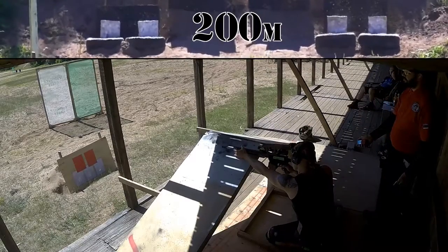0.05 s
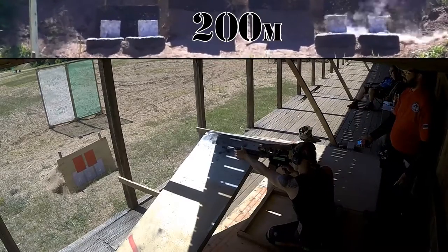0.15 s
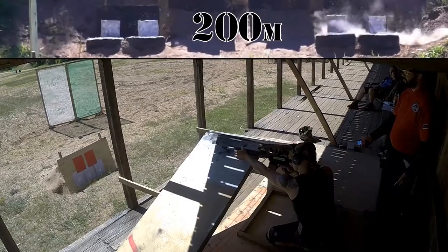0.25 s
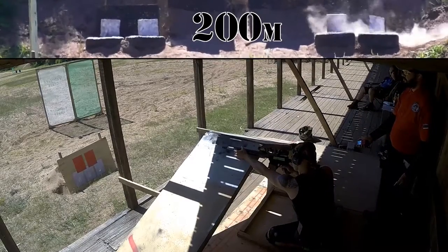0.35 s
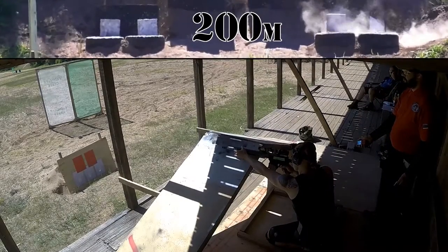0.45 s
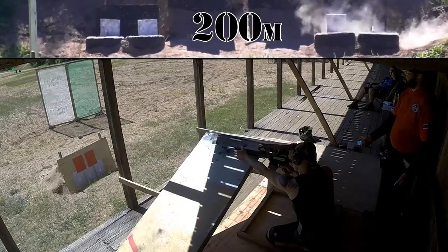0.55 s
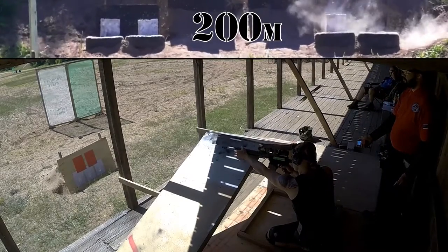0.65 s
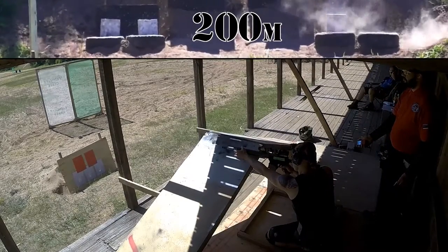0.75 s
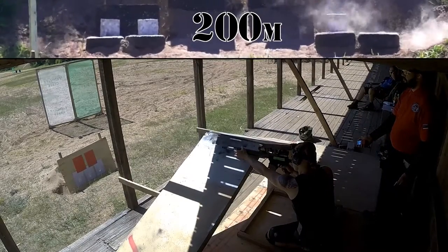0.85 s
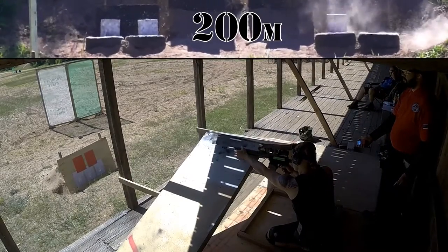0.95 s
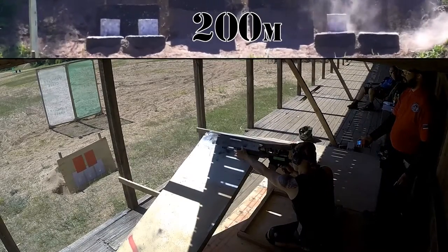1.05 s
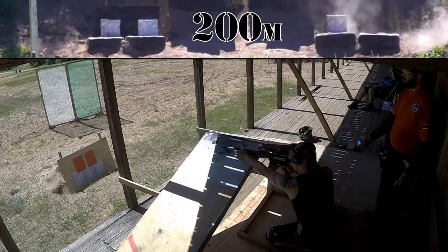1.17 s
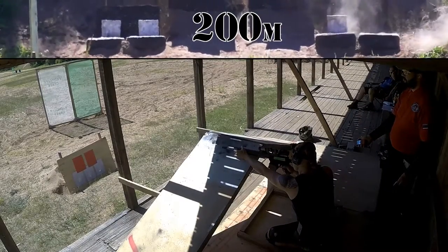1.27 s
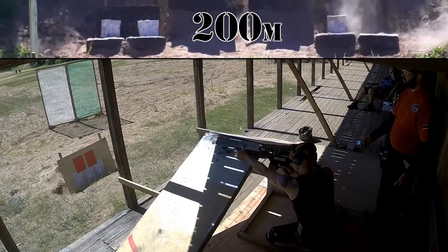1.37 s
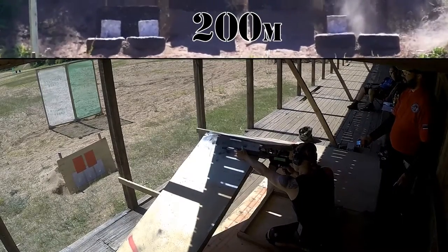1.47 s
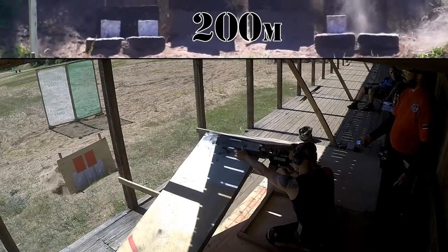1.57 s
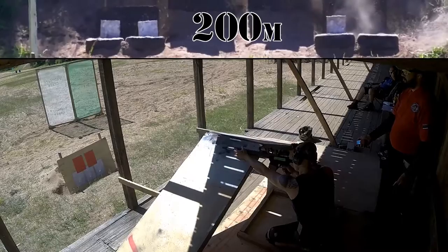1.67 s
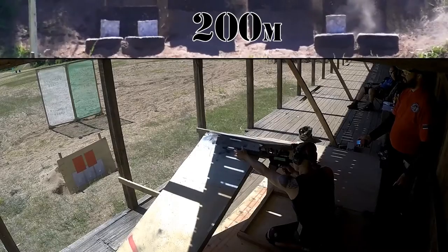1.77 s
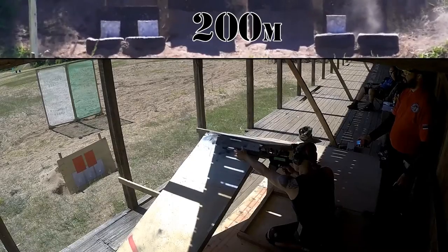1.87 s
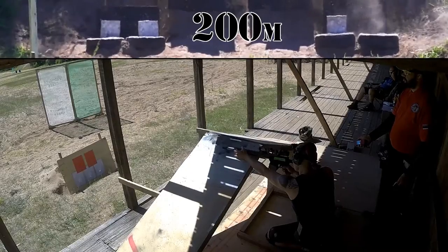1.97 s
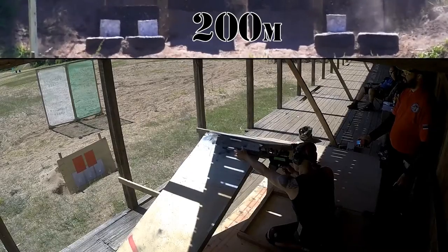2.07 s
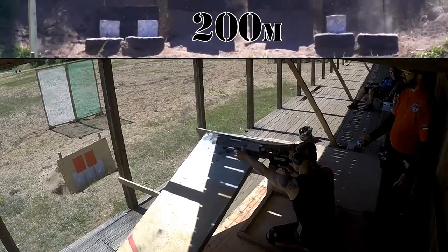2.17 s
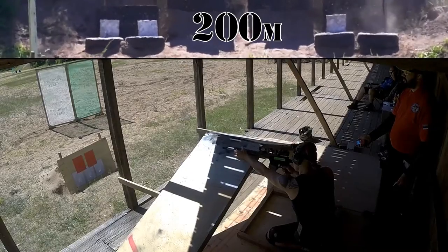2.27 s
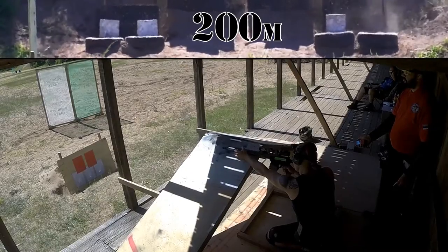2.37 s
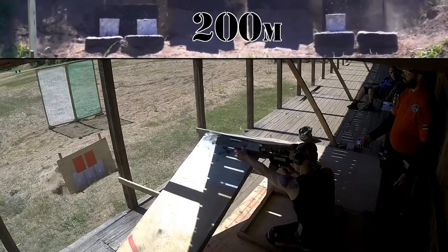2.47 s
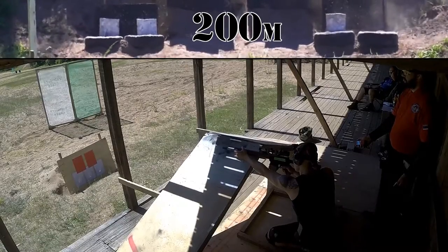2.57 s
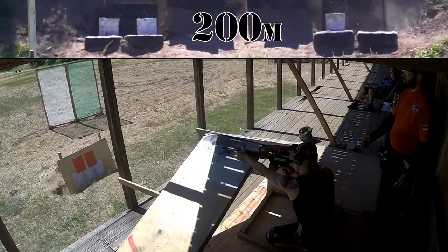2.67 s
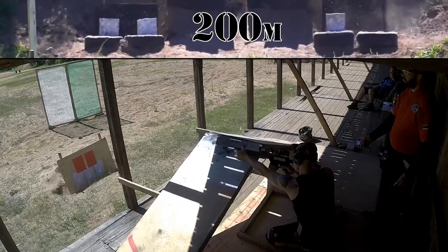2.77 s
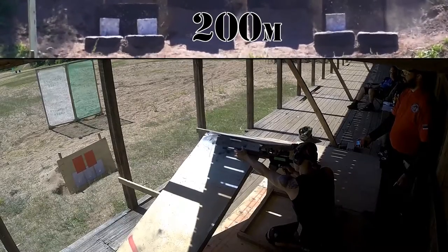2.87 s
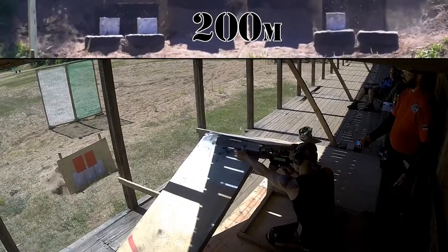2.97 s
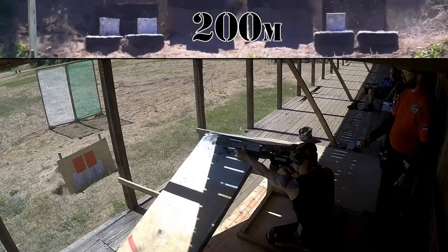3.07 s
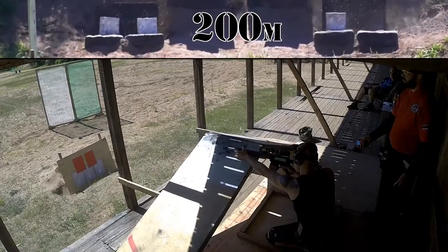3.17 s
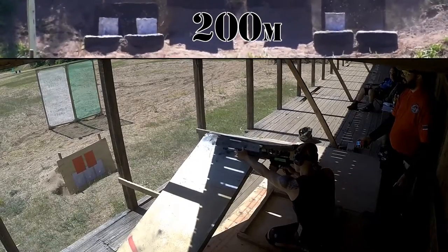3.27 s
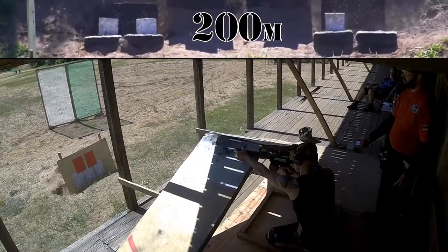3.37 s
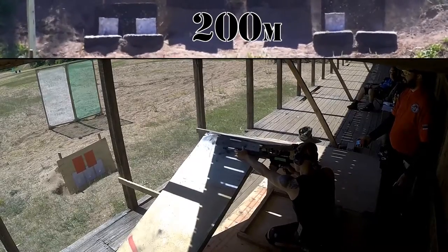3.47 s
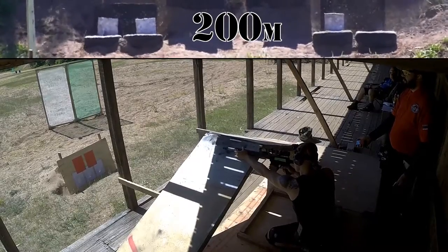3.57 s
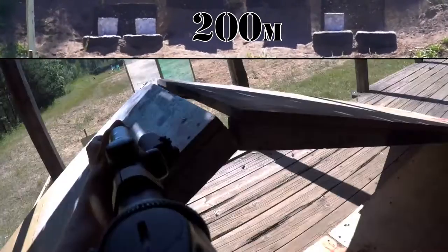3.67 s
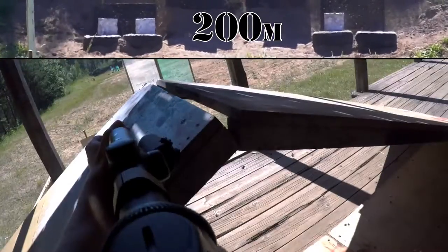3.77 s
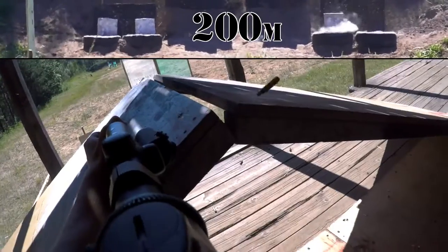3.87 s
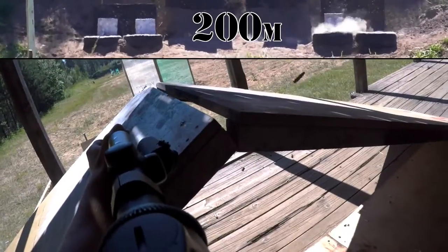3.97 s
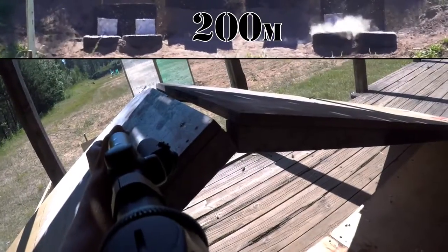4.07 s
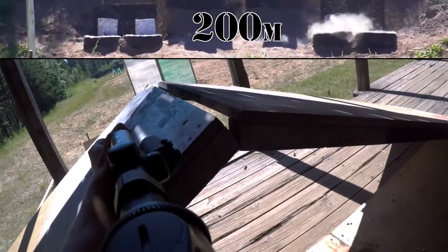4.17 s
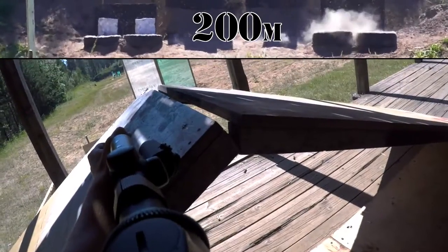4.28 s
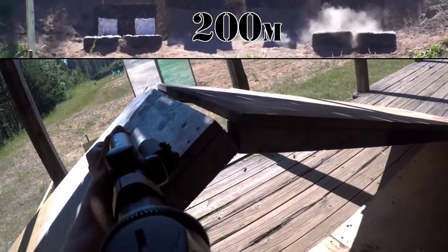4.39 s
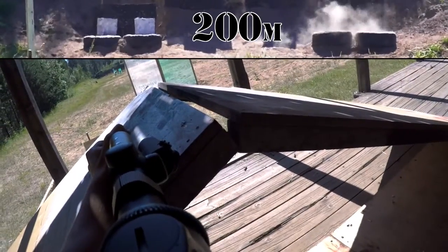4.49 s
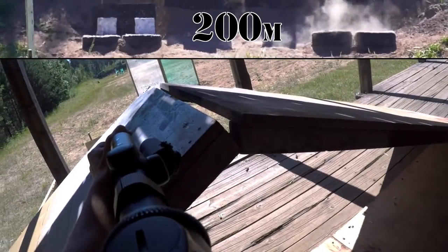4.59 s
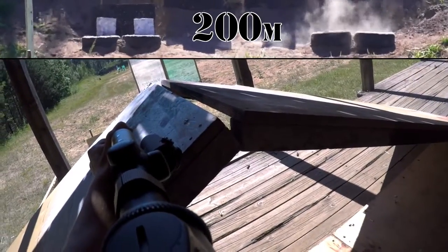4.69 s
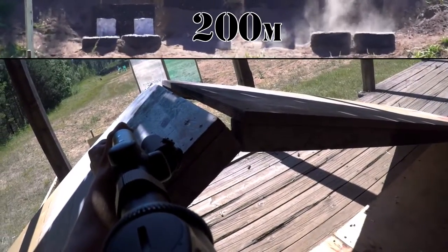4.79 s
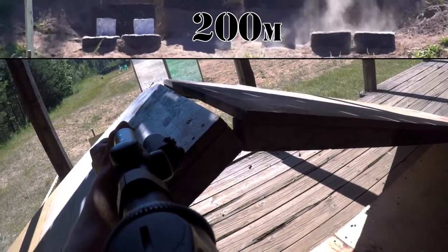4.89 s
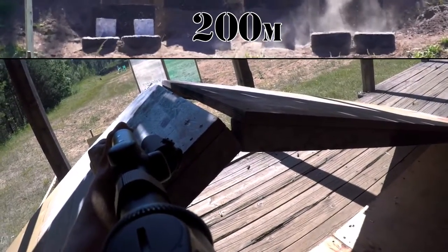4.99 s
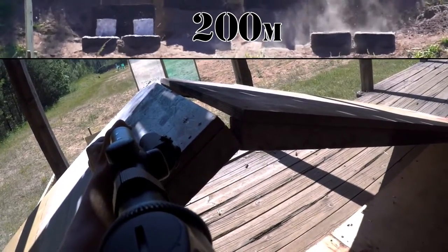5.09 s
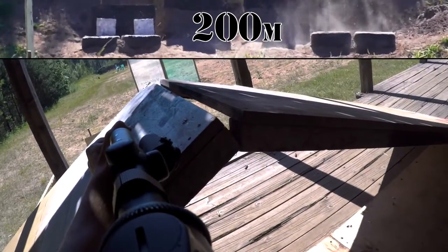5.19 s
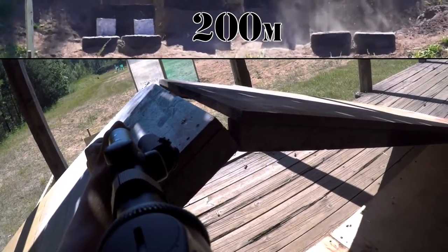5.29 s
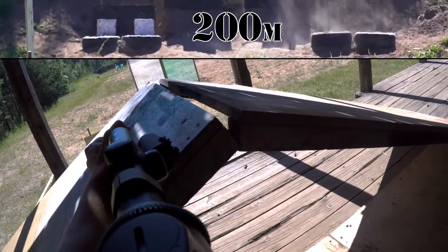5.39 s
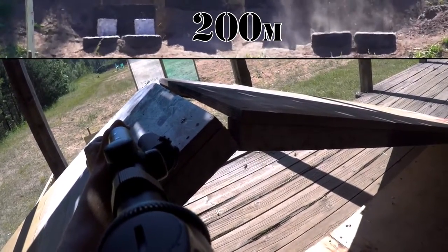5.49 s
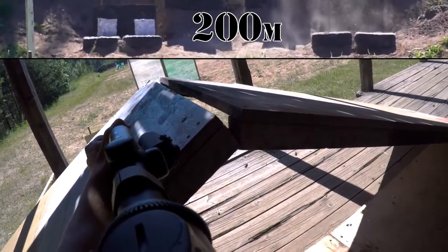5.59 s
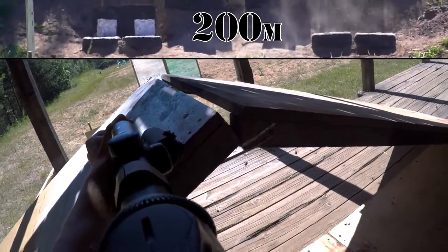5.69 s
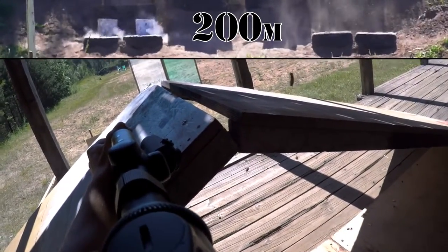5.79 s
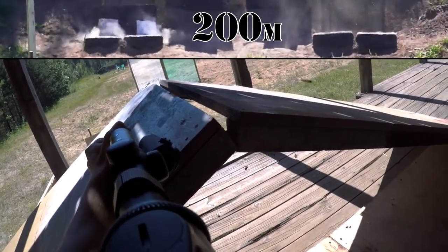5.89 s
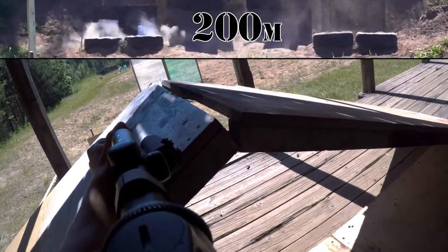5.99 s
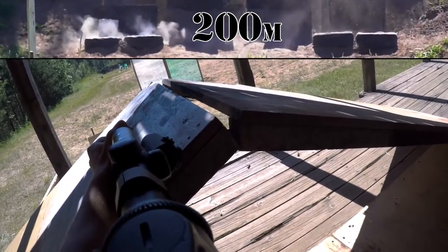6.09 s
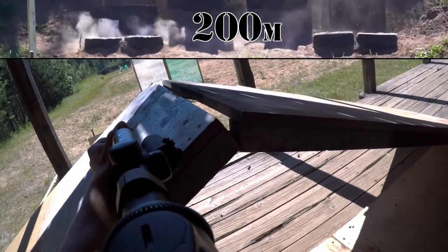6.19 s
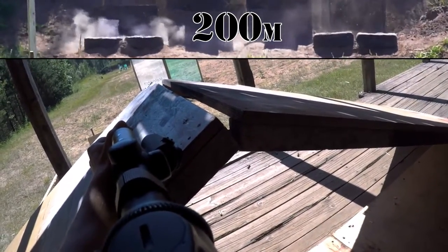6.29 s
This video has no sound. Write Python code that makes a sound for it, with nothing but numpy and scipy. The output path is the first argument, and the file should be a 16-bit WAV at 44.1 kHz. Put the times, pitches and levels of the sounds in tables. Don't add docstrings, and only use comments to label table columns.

```python
import sys
import numpy as np
from scipy import signal
from scipy.fft import rfft, irfft, next_fast_len
from scipy.io import wavfile
from scipy.ndimage import uniform_filter1d, minimum_filter1d

SR = 44100
rng = np.random.default_rng(int(sys.argv[2]) if len(sys.argv) > 2 else 0)


def digitize_waveform(pressure):
    field = np.atleast_2d(pressure).T
    bounded = np.clip(field, -1, 1)
    quanta = np.round(bounded * 32767).astype(np.int16)
    wavfile.write(sys.argv[1], SR, quanta)


def convert_level_to_amplitude(level_db):
    exponent = np.asarray(level_db, float) / 20
    return 10 ** exponent


N = 279594


def on_log(table, hz):
    f, value = np.transpose(table)
    return np.interp(np.log(hz + 1), np.log(f), value)


def add(out, x, start_s):
    i = int(start_s * SR)
    out[i:i + len(x)] += x[:len(out) - i]


def band_noise(low_hz, high_hz, order, size):
    b, a = signal.butter(order, [low_hz, high_hz], "band", fs=SR)
    return signal.lfilter(b, a, rng.standard_normal(size))


def bands(size, colour, centres):
    hz = np.fft.rfftfreq(size, 1 / SR)
    spectrum = rfft(rng.standard_normal(size)) * convert_level_to_amplitude(on_log(colour, hz))
    share = np.array([on_log(np.c_[centres, row], hz) for row in np.eye(len(centres))])
    parts = irfft(spectrum * share, size)
    return parts / np.std(parts.sum(0))


def walk(rate):
    k = int(SR / rate)
    held = np.repeat(rng.standard_normal(N // k + 1), k)
    return 1.3 * uniform_filter1d(uniform_filter1d(held, k), k)[:N]


def volley(times, shots, echoes, colour, t60, boom, air_db, boom_db, crack_db, rasp_hz, front_db,
           crack_s, wash_s, rise_s, same):
    out, t = np.zeros(N), np.arange(1 << 15) / SR
    hz, t60_s = np.transpose(t60)
    fade = convert_level_to_amplitude(-60 * t / t60_s[:, None]) * (1 - np.exp(-t / rise_s))
    shelter = bands(len(t), colour, hz)
    body = sum(swing * convert_level_to_amplitude(db - 60 * t / s) * np.sin(2 * np.pi * f * t) for f, db, s, swing in boom)
    front = convert_level_to_amplitude(front_db) * (1 - t / .0002) * np.exp(-t / .0004)
    bursts = sum((t >= lag) * convert_level_to_amplitude(db - 60 * abs(t - lag) / crack_s) for lag, db in echoes)
    for at, (db, rasp_db, wash_db, build_s) in zip(times, shots):
        air = same * shelter + np.sqrt(1 - same ** 2) * bands(len(t), colour, hz)
        rasp = convert_level_to_amplitude(crack_db + rasp_db) * bursts * band_noise(*rasp_hz, 1, len(t))
        wash = bands(len(t), colour, hz)[-2:].sum(0) * convert_level_to_amplitude(wash_db - 60 * t / wash_s)
        room = convert_level_to_amplitude(air_db) * (air * fade).sum(0) + convert_level_to_amplitude(boom_db) * body
        room = room * (1 - np.exp(-t / build_s))
        add(out, convert_level_to_amplitude(db) * (room + rasp + wash + front), at)
    return out


NEAR_S = [.0891, 1.3051, 2.3737, 3.0898, 3.7966, 5.6750]
# (strength [dB], rasp [dB], lingering wash [dB], build-up [s])
NEAR = [
    (-10, 5, -30, 0.00091),
    (-7.5, 1, -21, 0.0012),
    (-7.5, -0.5, -21, 0.0026),
    (-6, -4, -19.5, 0.0097),
    (-10, 3, -39, 0.0022),
    (-7, 2, -20.5, 0.00078),
]
# (delay [s], level [dB])
NEAR_ECHO = [(0, 0), (.0045, -10.5), (.0075, -2.5), (0.014, -4), (0.014, -8.5), (0.021, -17.5),
             (0.029, -16.5)]
# (frequency [Hz], level [dB per Hz])
NEAR_AIR = [(150, -14.5), (260, -5), (648, -5.5), (744, -8.5), (1010, -5.5), (1110, -8), (1210, -5),
            (4320, -15), (14400, -41), (16000, -65.5)]
# (frequency [Hz], t60 [s])
NEAR_T60 = [(60, 0.15), (190, 0.39), (400, 0.27), (1000, 0.23), (3000, 0.18), (7000, 0.2), (14000, 0.19)]
# (frequency [Hz], level [dB], t60 [s], first swing [+1 out, -1 in])
BOOM = [(41.3, 5.5, .14, -1), (74, 1.5, 0.11, 0.98), (112.9, 5, 0.12, -1), (152.5, -2, 0.3, -1),
        (209.1, 0.5, 0.15, 0.99), (262.7, 6, .09, -0.63), (283.3, -4, 0.18, 0.95), (376.3, -11, 0.34, 0.9),
        (477, -10, .17, -1), (591, -10, 0.32, 0.74), (796, -15.5, 0.092, -0.9), (848, -7, 0.21, 0.92),
        (1172, -15, 0.17, 1)]


def near_rifle():
    return volley(NEAR_S, NEAR, NEAR_ECHO, NEAR_AIR, NEAR_T60, BOOM, air_db=6, boom_db=2.5, crack_db=7.5,
                  rasp_hz=(1500, 7000), front_db=-6.5, crack_s=0.016, wash_s=.6, rise_s=0.0012, same=0.86)


def action():
    out, u = np.zeros(N), np.arange(400) / SR
    for at in NEAR_S:
        click = np.diff(rng.standard_normal(101)) * np.linspace(.15, 1, num=100)
        add(out, convert_level_to_amplitude(-13) * click, at - 100 / SR)
        for lag, db in [(.148, -52), (.16, -58)]:
            clack = band_noise(5000, 13000, 2, len(u))
            level = convert_level_to_amplitude(db + 3 * rng.standard_normal() - 60 * u / .02)
            add(out, level * clack, at + lag + .006 * rng.standard_normal())
    return out


FAR_S = [.0289, 1.8478, 3.7453]
# (strength [dB], rasp [dB], lingering wash [dB], build-up [s])
FAR = [
    (1, 0.012, -25, 0.00036),
    (-6.5, 0.0073, -16.5, 0.00025),
    (-3, 0.00034, -21, .0002),
]
# (delay [s], level [dB])
FAR_ECHO = [(0, -9.5), (.004, -9.5), (.009, -8.5), (0.013, -5.5)]
# (frequency [Hz], level [dB per Hz])
FAR_AIR = [(35, -43.5), (60, -8), (200, 4), (480, -4), (636, -2.5), (822, -0.5), (1580, -7.5),
           (1780, -11.5), (3670, -13), (9790, -37), (14200, -48), (16000, -82)]
# (frequency [Hz], t60 [s])
FAR_T60 = [(60, 0.37), (250, 0.34), (600, 0.19), (1500, 0.14), (4000, 0.13), (12000, 0.19)]
# (frequency [Hz], level [dB], t60 [s], first swing [+1 out, -1 in])
FAR_BOOM = [(45, -4.5, 0.075, -1), (102, -1.5, 0.13, 0.99), (191.2, -3.5, 0.3, -0.8), (285, -10, 0.38, 1),
            (383, 2, 0.085, 1), (464.3, 0, 0.12, -1.7), (586, -7.5, 0.29, -1), (803, 0.5, 0.1, 1),
            (2000, -6.5, 0.19, 0.75)]


def far_rifle():
    return volley(FAR_S, FAR, FAR_ECHO, FAR_AIR, FAR_T60, FAR_BOOM, air_db=-2.5, boom_db=-7.0, crack_db=-24,
                  rasp_hz=(900, 4500), front_db=2, crack_s=0.019, wash_s=.8, rise_s=0.0022, same=0.67)


# (time [s], tick rms [dB], tail t60 [s], tail level [dB], treble [dB])
TICKS = [
    (.538, -55, .1, -4, 0),
    (0.9095, -29.5, 0.32, -3, -2.5),
    (1.188, -45.5, 0.25, 2.5, -10),
    (4.616, -41, 0.2, -1.5, 6),
    (4.631, -35.5, 0.14, -4.5, -4),
    (4.905, -54, .09, -13.5, 5),
    (4.92, -79, 0.041, -10, 17),
    (5.008, -66, .1, -3, 4),
    (5.082, -47, 0.55, -4, -5.5),
]
# (frequency [Hz], level [dB per Hz])
TICK_AIR = [(35, -42.5), (60, -28.5), (569, -10), (893, -12), (1120, -8), (1430, -6.5), (2050, -5.5),
            (2810, -9.5), (5780, -20.5), (13000, -71)]
# (frequency [Hz], rms [dB], loudest after [s], swell width [s])
CASE_A = [(1828, -48, .1, .2), (2502, -57, .09, .08), (3024, -59, .02, .07), (3349, -60, .06, .06),
          (3504, -57, .03, .07), (4132, -64, .15, .12), (5293, -61, .18, .05), (5678, -58, .1, .055),
          (6299, -79, .18, .08), (7450, -81, .05, .1), (8231, -78, .05, .04), (9620, -96, .11, .04)]
# (frequency [Hz], rms [dB], loudest after [s], swell width [s])
CASE_B = [(1726, -57, .15, .2), (3240, -65, .15, .2), (4869, -75, .27, .1), (5207, -67, .07, .35),
          (7680, -93, .02, .1)]
# (frequency [Hz], rms [dB], loudest after [s], swell width [s])
CHIRP = [(13018, -66, .03, .045)]
# (time [s], length [s], partials)
RINGS = [
    (.93, .26, CASE_A),
    (4.65, .34, CASE_B),
    (1.905, .15, CHIRP),
    (2.26, .1, CHIRP),
]


def spent_cases():
    out, t = np.zeros(N), np.arange(N) / SR
    for at, db, t60, tail_db, treble_db in TICKS:
        u = t[:SR // 3]
        low, high = bands(len(u), TICK_AIR, [2000, 5000])
        grit = (low + convert_level_to_amplitude(treble_db) * high) * (1 - np.exp(-u / 0.00026)) ** 2
        fall = convert_level_to_amplitude(-60 * u / 0.02) + convert_level_to_amplitude(tail_db - 60 * u / t60)
        add(out, convert_level_to_amplitude(db) * grit * fall, at)
    for start, length, modes in RINGS:
        u = t[:int(length * SR)]
        edge = np.clip(np.minimum(u / .01, (length - u) / 0.027), 0, 1)
        for hz, db, top, spread in modes:
            swell = convert_level_to_amplitude(2 * walk(60)[:len(u)]) / (1 + ((u - top) / spread / 1.4) ** 2) ** 2
            add(out, np.sqrt(2) * convert_level_to_amplitude(db) * edge * swell * np.sin(2 * np.pi * hz * u), start)
    return out


# (time [s], near scatter [dB], far return [dB], return brightness [dB], microphone gain dip [dB])
ROLLS = [
    (-.3, -45.5, -39, 1, 5),
    (.089, -47.5, -35.5, 0.5, 30.5),
    (1.305, -51, -42, 6, 13),
    (1.848, -43.5, -38.5, 0.5, 6),
    (2.374, -49, -37.5, 0.5, 14),
    (3.09, -48, -37, 2.5, 11.5),
    (3.797, -48.5, -37, 0.5, 16),
    (4.76, -91, -46, 5, 0),
    (5.02, -92.5, -42.5, -0.5, -4),
    (5.675, -47, -39, 2, 27.5),
]
# (frequency [Hz], level [dB per Hz])
ROLL_AIR = [(15, -45), (25, -16), (60, -7), (102, -14.5), (144, -14), (353, -7.5), (761, -2), (892, -5.5),
            (2780, -16), (4730, -27), (7220, -46), (12600, -64.5), (14000, -71.5)]
# (low edge [Hz], high edge [Hz])
ROLL_EDGES = [(40, 250), (400, 1500), (2000, 4500), (5500, 9000)]
# (still air [dB], scatter [dB], its fall [dB/s], return [dB], its fall [dB/s])
ROLL_PARTS = [(-60, 7.5, 36.5, -21, 11.5), (-62.5, 17, 33.5, 0.5, 7.5), (-61.5, 13, 35.5, -4, 18),
              (-88, -0.5, 25.5, -35, 23.5)]
BRIGHT_SHARES = [-1, 0, 1, .5]


def range_echo():
    return_s, return_rise_s, recover_s = .5, .06, 0.72
    t = np.arange(N) / SR
    at, scatter_db, return_db, bright_db, dip_db = np.transpose(ROLLS)[:, :, None]
    age = np.maximum(t - at, 0)
    arrive = (t > at) / (1 + np.exp((return_s - age) / return_rise_s))
    gain = convert_level_to_amplitude(-(dip_db * (t > at) * np.exp(-age / recover_s)).max(axis=0))
    centres = [np.sqrt(lo * hi) for lo, hi in ROLL_EDGES]
    parts = bands(next_fast_len(N), ROLL_AIR, centres)[:, :N]
    power = abs(rfft(parts.sum(0))) ** 2 * 2 / N ** 2
    hz = np.fft.rfftfreq(N, 1 / SR)
    out, patchy_db = 0, walk(9.9)
    for part, levels, (lo, hi), share in zip(parts, ROLL_PARTS, ROLL_EDGES, BRIGHT_SHARES):
        still_db, near_db, near_fall, far_db, far_fall = levels
        unit = part / np.sqrt(power[(hz > lo) & (hz < hi)].sum())
        near = (t > at) * convert_level_to_amplitude(scatter_db + near_db - near_fall * age) ** 2
        far_level_db = return_db + share * bright_db + far_db - far_fall * (age - return_s)
        far = arrive * convert_level_to_amplitude(far_level_db) ** 2
        level = np.sqrt(gain ** 2 * (near + far).sum(axis=0) + convert_level_to_amplitude(still_db) ** 2)
        out = out + unit * level * convert_level_to_amplitude(patchy_db + walk(25))
    return out


# (time [s], level [dB], frequency [Hz])
BUMPS = [
    (0, -32, 70.4),
    (.905, -53, 60.5),
    (1.219, -45, 45),
    (5.09, -42.5, 39.4),
    (5.47, -48, 55),
    (6.309, -51, 55),
]


def bumps():
    out, u = np.zeros(N), np.arange(SR // 20) / SR
    for at, db, hz in BUMPS:
        add(out, convert_level_to_amplitude(db) * np.hanning(len(u)) * np.sin(2 * np.pi * hz * u), at)
    return out


def scene():
    return (near_rifle() + action() + far_rifle() + spent_cases() + range_echo() + bumps())[None]


def band_limit(x):
    return signal.sosfilt(signal.butter(12, 16510, fs=SR, output="sos"), x)


def record(dry):
    x = .89 * dry / (1 + abs(dry) ** 4) ** (1 / 4)
    loud = (abs(dry) > .55).astype(float)
    overload = (abs(dry) > 1).astype(float)
    coming = -minimum_filter1d(-overload, size=801, origin=-400)
    past = -minimum_filter1d(-loud, size=241, origin=120)
    dip = uniform_filter1d(coming, size=301, origin=150) * (1 - past)
    x = x * convert_level_to_amplitude(-11 * dip)
    x = signal.lfilter(*signal.butter(1, [5, 12000], "band", fs=SR), x)
    x = signal.sosfilt(signal.ellip(9, .1, 40, 15300, fs=SR, output="sos"), x)
    return band_limit(x)


dry = scene()
out = record(dry)
digitize_waveform(out)
```